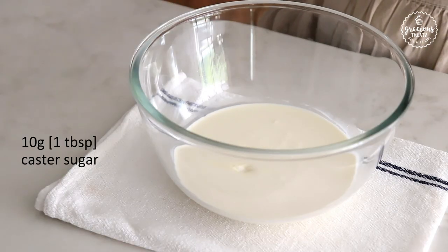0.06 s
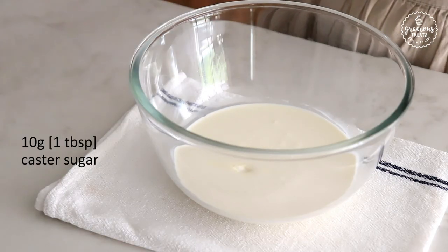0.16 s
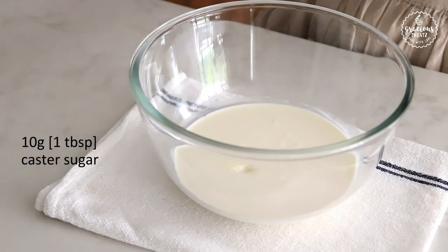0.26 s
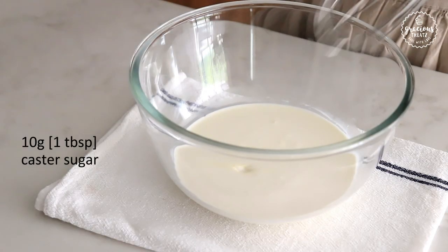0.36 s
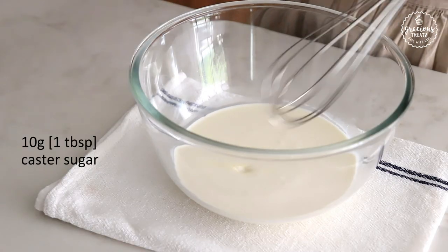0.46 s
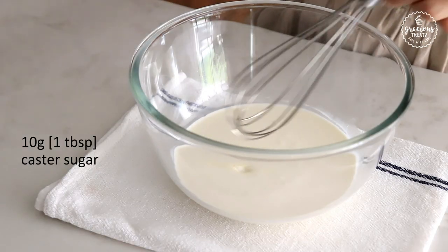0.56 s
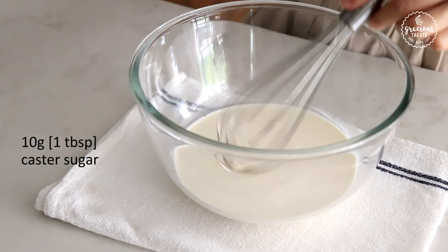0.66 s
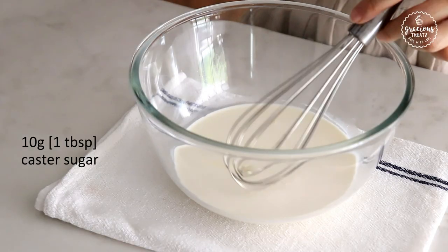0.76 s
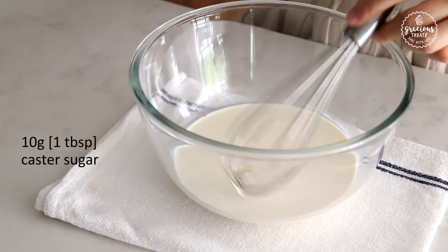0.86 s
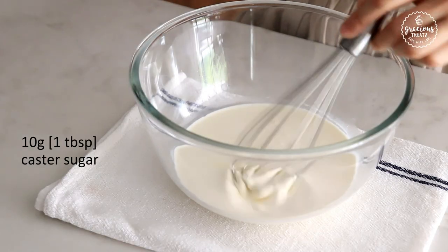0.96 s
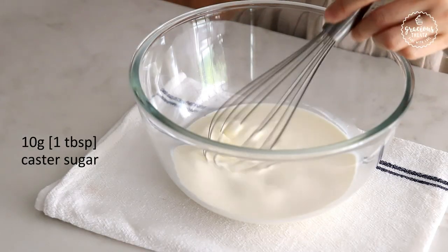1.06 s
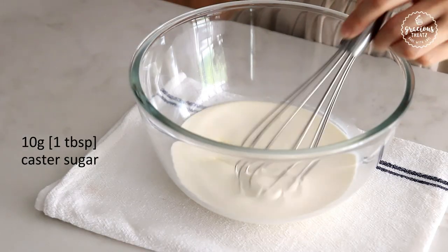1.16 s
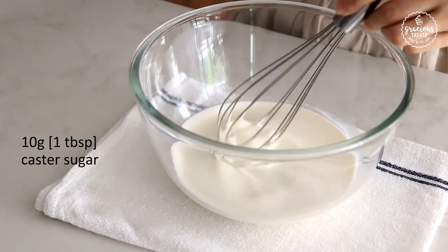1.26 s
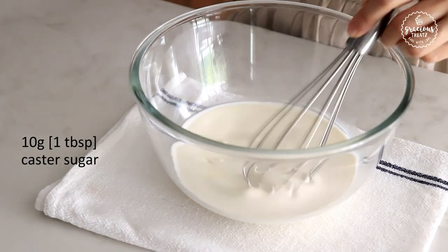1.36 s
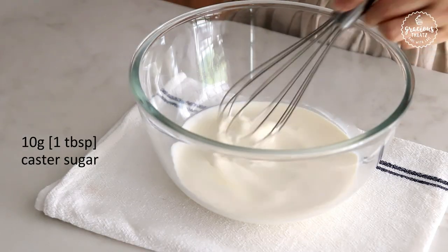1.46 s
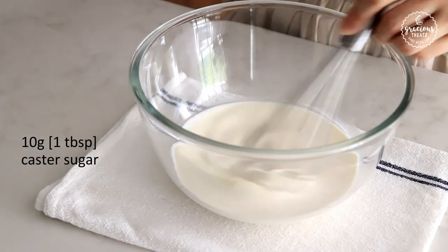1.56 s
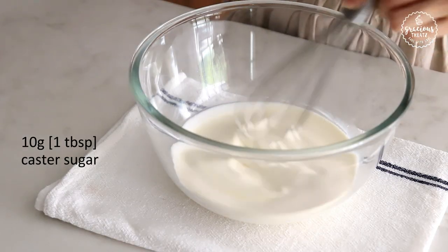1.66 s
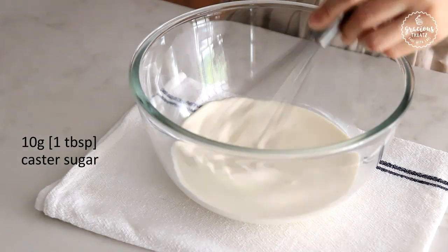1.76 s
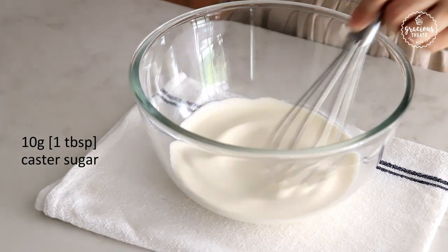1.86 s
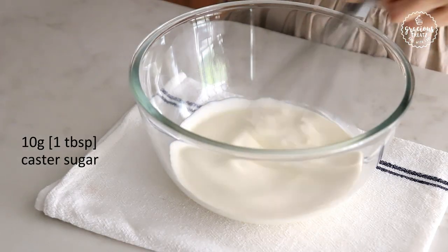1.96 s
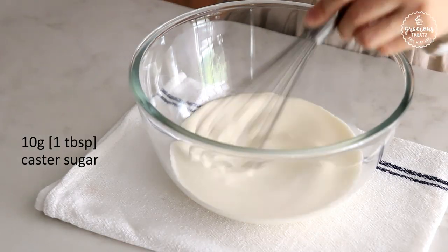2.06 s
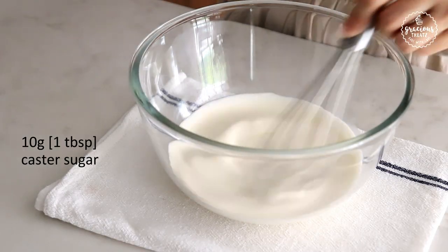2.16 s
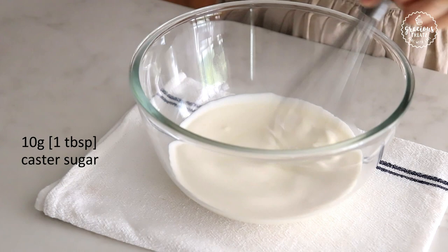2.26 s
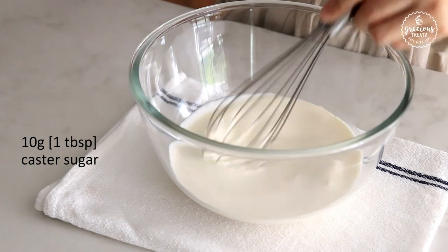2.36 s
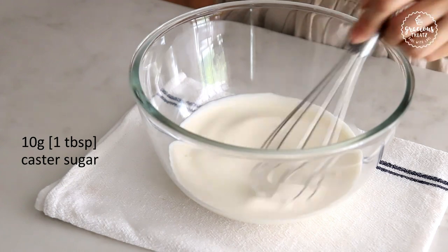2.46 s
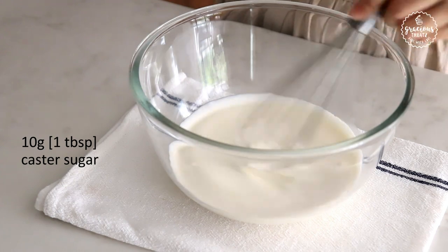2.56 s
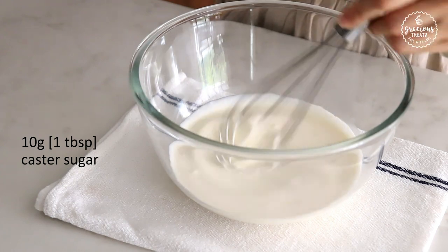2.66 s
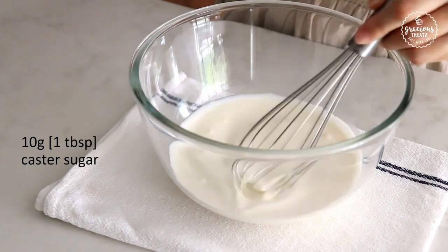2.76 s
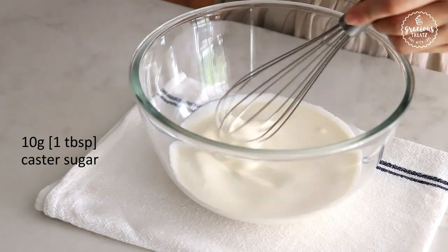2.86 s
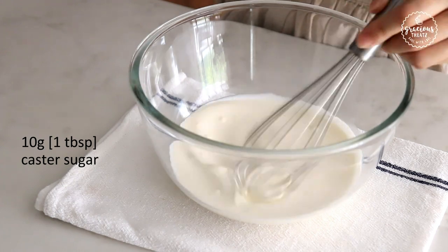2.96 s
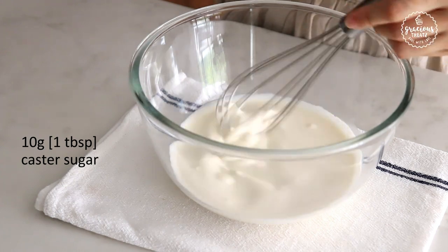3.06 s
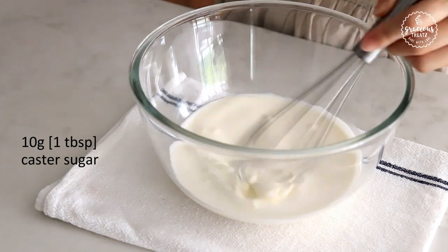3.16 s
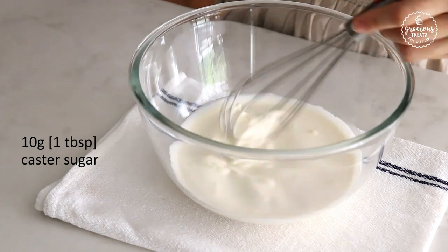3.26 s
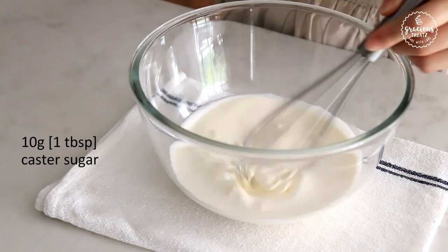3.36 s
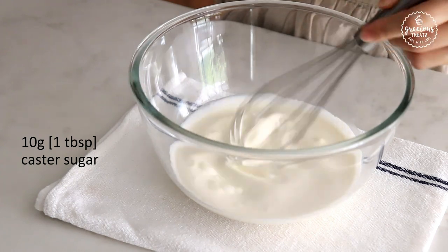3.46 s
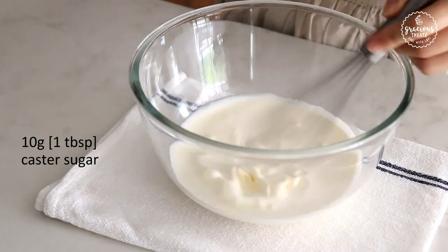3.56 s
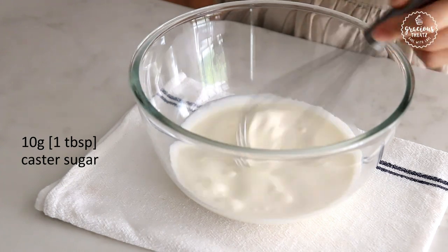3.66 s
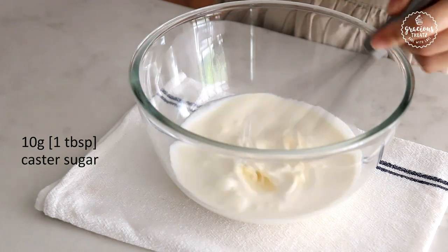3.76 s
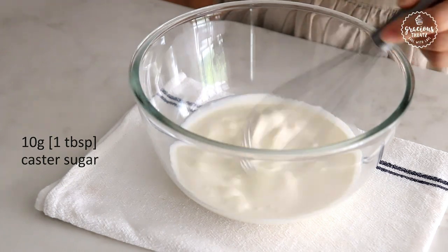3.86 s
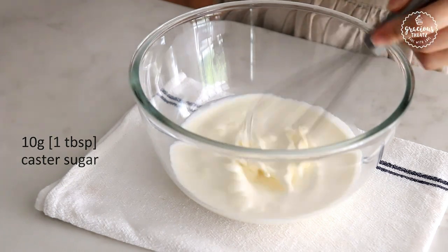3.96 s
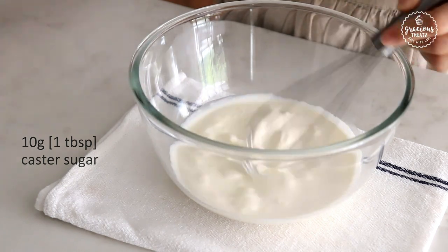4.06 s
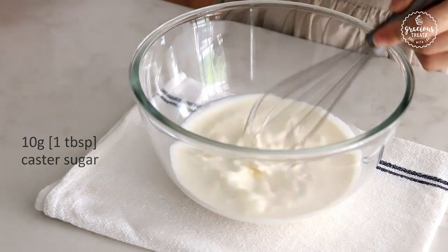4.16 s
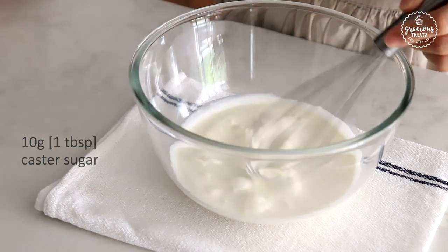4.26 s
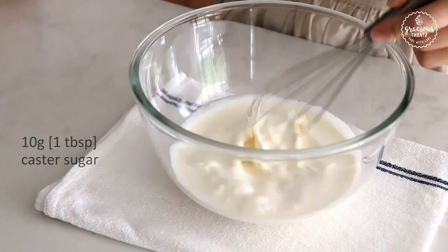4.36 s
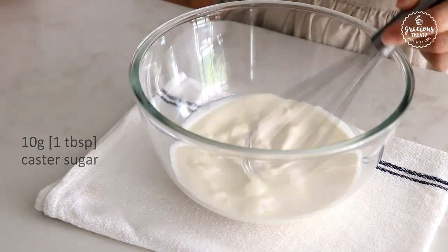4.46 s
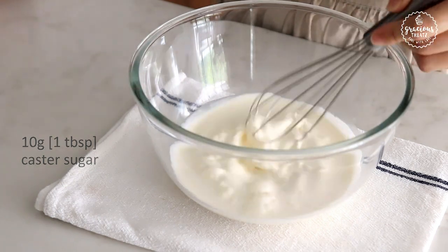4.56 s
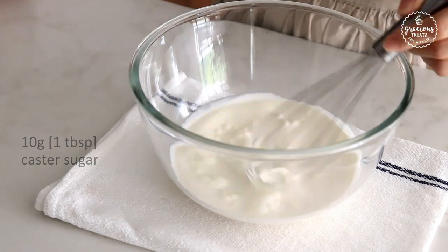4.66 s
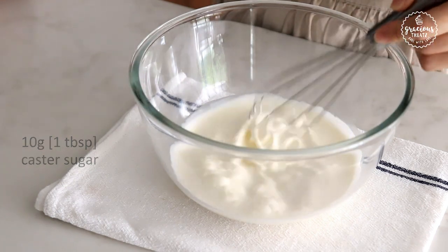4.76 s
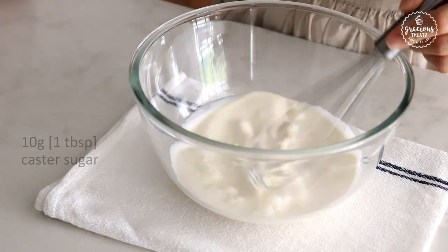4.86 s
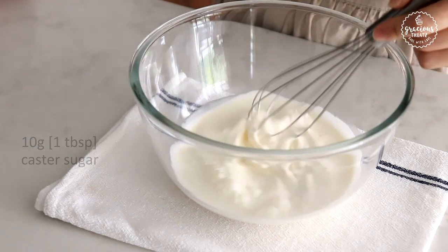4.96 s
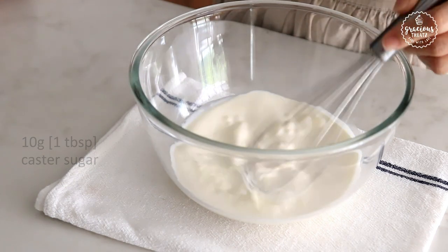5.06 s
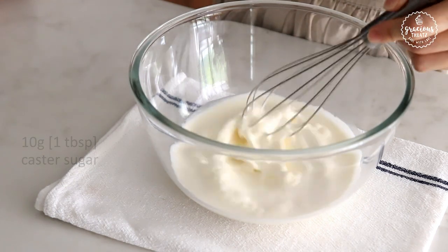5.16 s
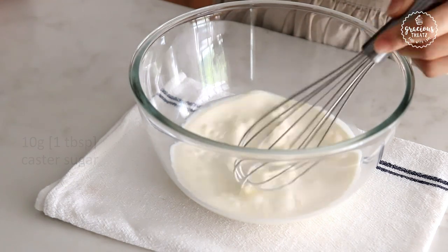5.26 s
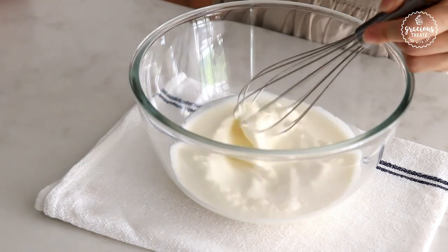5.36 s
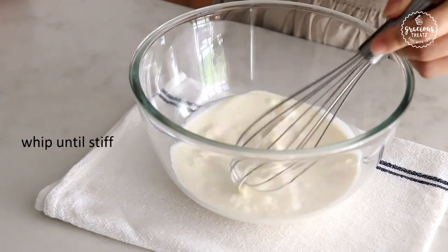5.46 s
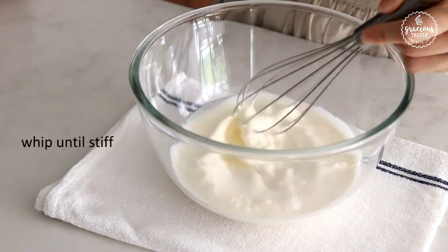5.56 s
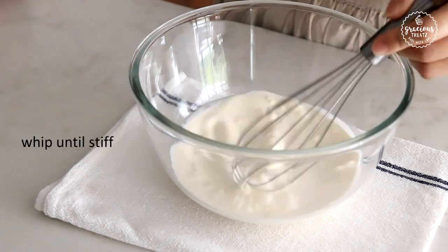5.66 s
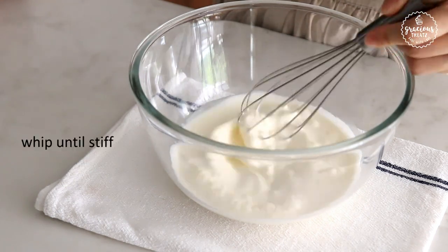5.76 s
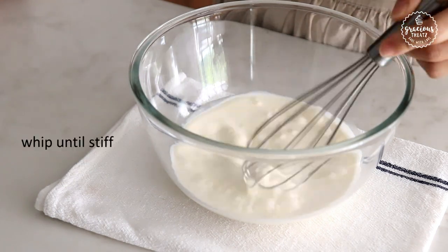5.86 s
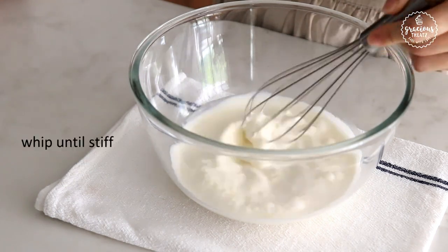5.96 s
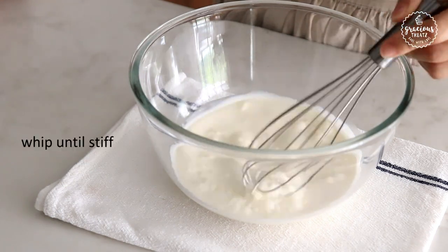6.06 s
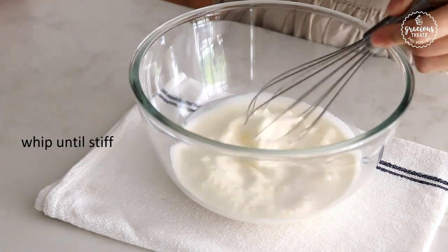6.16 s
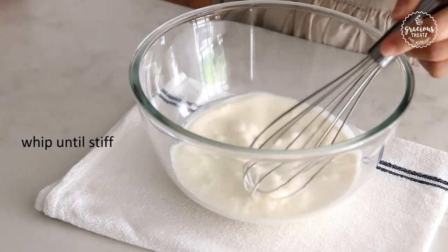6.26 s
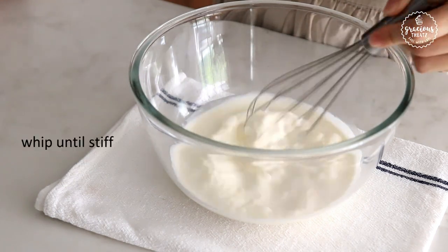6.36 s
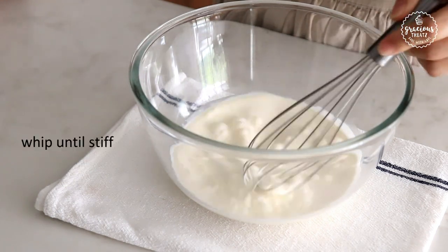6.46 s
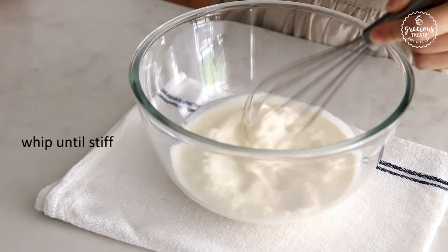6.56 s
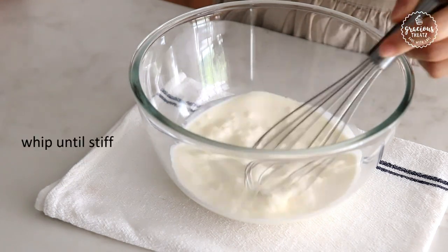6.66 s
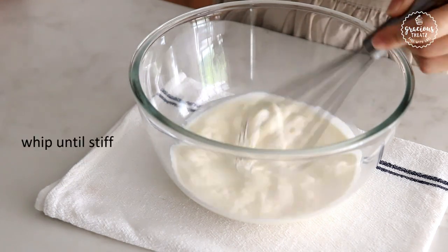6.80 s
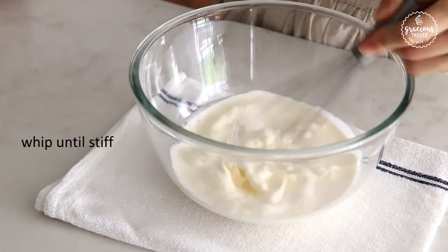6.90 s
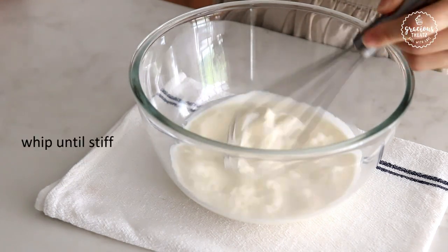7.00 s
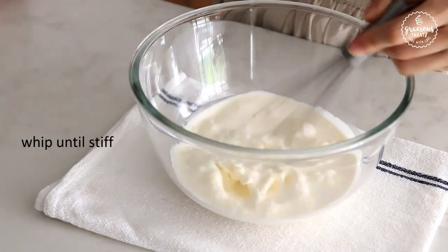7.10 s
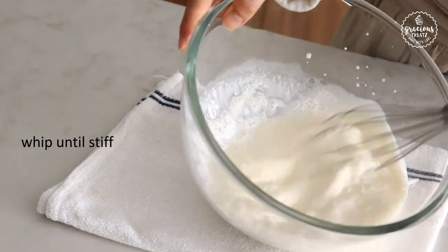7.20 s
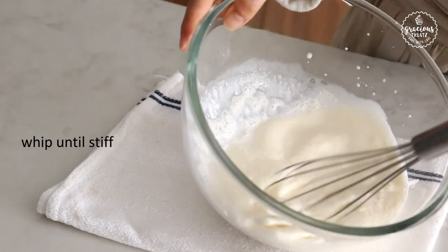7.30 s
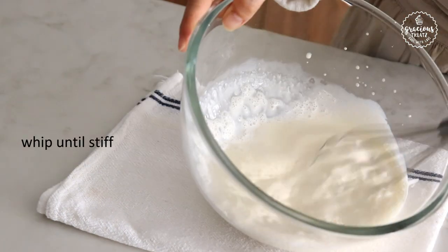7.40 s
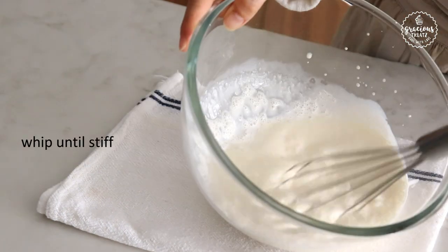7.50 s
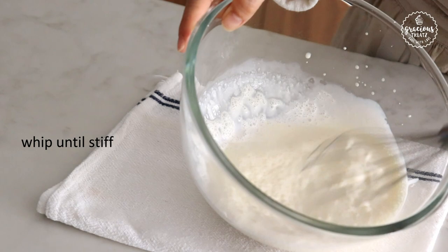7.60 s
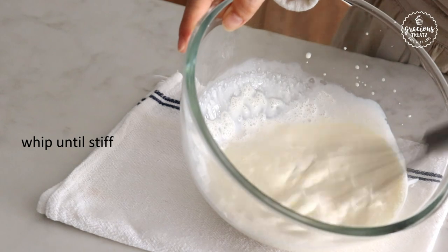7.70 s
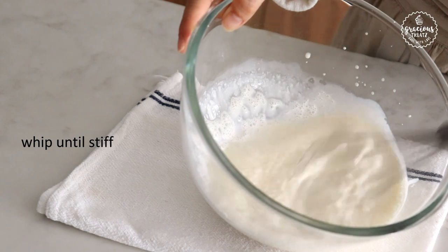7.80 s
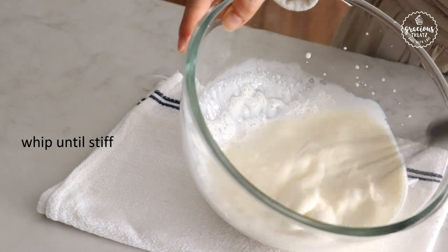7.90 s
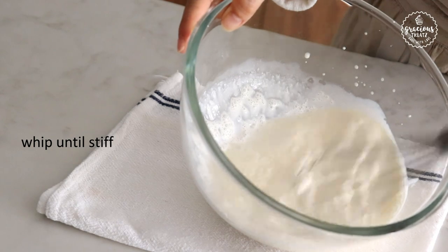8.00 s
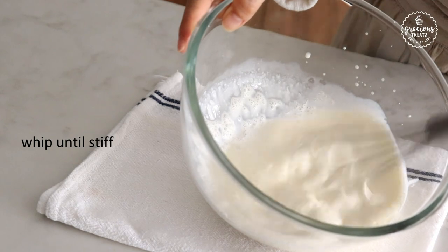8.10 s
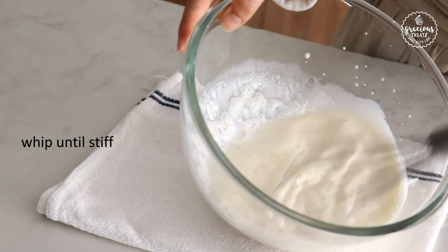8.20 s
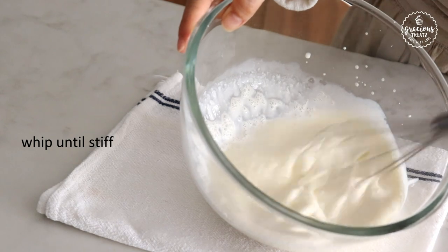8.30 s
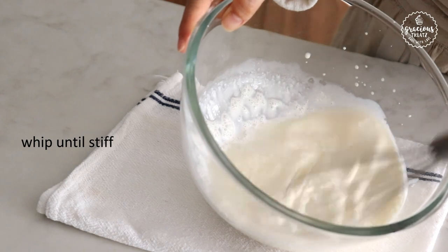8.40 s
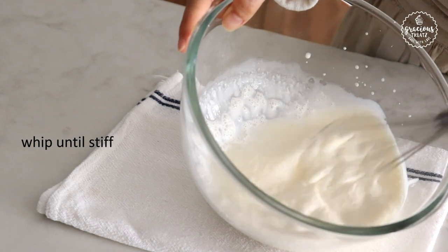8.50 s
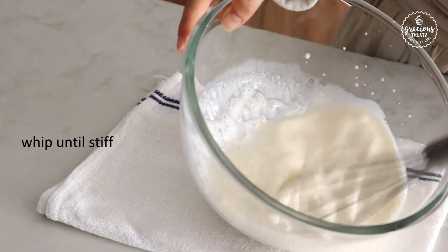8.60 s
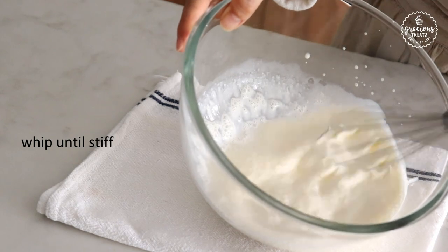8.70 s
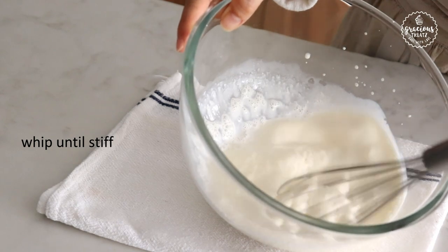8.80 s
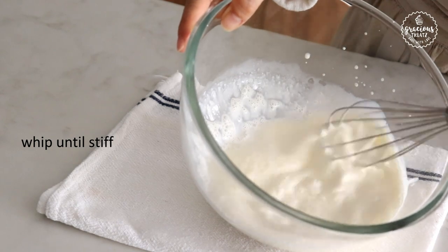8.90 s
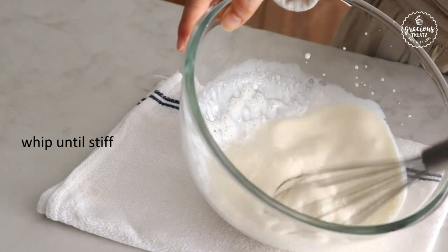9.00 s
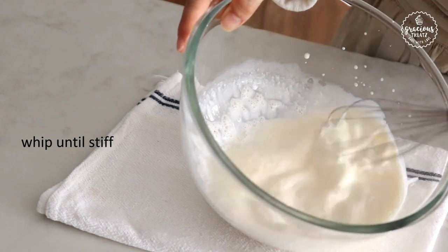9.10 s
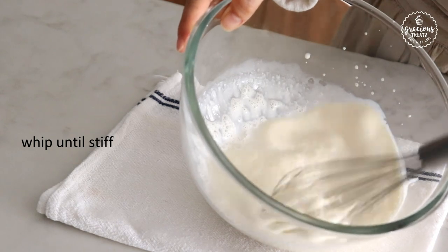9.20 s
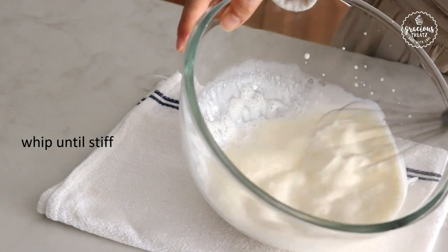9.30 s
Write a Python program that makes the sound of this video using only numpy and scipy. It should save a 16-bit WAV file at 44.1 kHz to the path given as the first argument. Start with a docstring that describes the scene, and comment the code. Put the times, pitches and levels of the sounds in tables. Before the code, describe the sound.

Close-up of cream being whisked by hand in a glass bowl on a towel, with a lively indoor echo. Soft room air first, then a bright double clink and gentle metallic scraping. Steady quick beating follows, wet and bubbly, with small plops, chirps and pops as the cream froths. A low bump marks the bowl being tilted, then denser glassy wire knocks continue to the end with little splashing.

```python
"""A wire whisk beats cream in a glass bowl standing on a towel in a quiet, echoing kitchen.
It clinks in and stirs, wires skidding and the rim singing, then beats about five turns a second.
Each turn rattles on the near and far wall through glass and wire modes and folds in swarms of bubbles.
Near the end the bowl is tilted: the wires hit more freely ringing glass up to three times a turn.
Contacts are noise rattles through ringing bodies; bubbles are gliding, dying sines."""
import sys
import numpy as np
from scipy import signal
from scipy.fft import rfft, irfft
from scipy.io import wavfile
from scipy.ndimage import uniform_filter1d

SR = 44100
rng = np.random.default_rng(int(sys.argv[2]) if len(sys.argv) > 2 else 0)


def int16_out(signal):
    """Quantize to a 16-bit WAV file."""
    q = np.round(np.clip(np.atleast_2d(signal).T, -1, 1) * 32767)
    wavfile.write(sys.argv[1], SR, q.astype(np.int16))


N = 411894
TIME = np.arange(N) / SR   # scene clock [s]
AGE = np.arange(SR // 5) / SR   # time since the start of one short sound [s]
MIDDLE_S = AGE.mean()   # centre of a sound that swells and fades

# Levels in the tables are relative: each layer adds its own gain.
# quiet kitchen air: (frequency [Hz], level [dB])
AIR_SPECTRUM = [(30, -68), (70, -18), (300, -3.5), (480, -9), (780, -9.5), (1200, -17.5), (3900, -22),
                (7000, -35.5), (16000, -38.5)]
AIR_DB = -62
# how the bowl is held: (time [s], cream on the wires [0-1], tilt [0-1])
BOWL_POSE = [(0, 0, 0), (1.5, .1, 0), (2.1, .7, 0), (2.9, 1, 0), (7.18, 1, 0), (7.33, 1, 1)]
BEATING_FROM_S, FROTHY_BY_S = 2.8, 7.6

# the tick of one wire on glass: (frequency [Hz], level [dB])
TICK_SPECTRUM = [(100, -78), (400, 6), (700, 19.5), (1500, -28.5), (2600, 28), (4000, -5), (6000, 20.5),
                 (9000, -4.5), (13000, -4), (16000, 22)]
# glass bowl modes: (frequency [Hz], width [Hz], level [dB])
GLASS_MODES = [(349.6, 21.4, 7), (582, 102, -3.5), (776, 103, -0.5), (885, 33, 3), (1424, 84, -1.5),
               (2466, 35, 4), (2550, 234, 4), (3783, 186, 9.5), (4950, 120, -5.5), (7290, 66, -5.5),
               (7650, 235, 0), (11090, 1020, -0.5), (13640, 1270, 2)]
# bare wire loop modes: (frequency [Hz], width [Hz], level [dB])
WIRE_MODES = [(2450, 60, -4), (3130, 50, -3), (3410, 45, -1), (4600, 7, 1.5), (7080, 16, 11), (7380, 35, 1),
              (9080, 40, 0), (10320, 36, 3), (11930, 36, 3), (14250, 70, 1)]
# bowl and worktop bumped through the towel: (frequency [Hz], width [Hz], level [dB])
WORKTOP_MODES = [(70, 10, 6), (138, 14, 2), (215, 35, -4), (385, 30, 1)]
# the rim singing under a sliding wire: (frequency [Hz], width [Hz], level [dB])
RIM_MODES = [(2430, 70, 8), (3720, 140, 7), (4980, 160, -4)]

# slow stirring, the wires tap the bowl: (time [s], strength [dB])
STIRRING_TAPS = [(1.0044, -21.5), (1.05, -20.5), (1.2102, -35), (1.4014, -27.5), (1.5716, -35),
                 (1.7736, -35.5), (2.063, -27.5), (2.489, -38), (2.509, -33.5)]
TAP_RING_DB = -4.5   # the rim's answer against the tap, before the layer gains
STIRRING_TO_S = 2.71
# the wires skid along the glass: (time [s], level [dB])
WIRE_SKIDS = [(1.284, -50), (1.482, -50.5), (1.634, -49.5), (1.719, -51.5), (1.835, -54.5), (2.206, -51.5),
              (2.374, -50)]
# a wire sticks and slips, and the rim sings one note: (time [s], level [dB], pitch [Hz])
RIM_SQUEALS = [(1.72, -41.5, 3670), (2.34, -48.5, 3710)]

# beating, one row per turn of the wrist:
# (time [s], strength [dB], time to cross the bowl [s], far wall against near wall [dB])
WRIST_TURNS = [(2.864, -23, 0.071, -42), (3.063, -23, 0.03, -40), (3.255, -29, 0.065, -1.5),
               (3.4564, -20, 0.054, -12), (3.6392, -23.5, 0.06, 0), (3.831, -24, 0.054, 0),
               (4.027, -21.5, 0.053, -3), (4.2082, -26, 0.066, -7.5), (4.4066, -20.5, 0.042, -1.5),
               (4.6043, -21.5, 0.052, 0), (4.7958, -22.5, 0.05, 0), (4.9942, -20, 0.03, -17),
               (5.1894, -16.5, 0.051, -11), (5.3864, -22, 0.031, 0), (5.5874, -23, 0.043, -2.5),
               (5.788, -27, 0.052, 1), (5.986, -24.5, .048, 3), (6.1842, -20, 0.045, -11),
               (6.3836, -19.5, 0.05, -2), (6.573, -20, 0.044, -4.5), (6.7719, -17.5, 0.044, -5),
               (6.974, -18, 0.042, -1), (7.178, -17, 0.071, -13)]
# cream thrown by a contact, against its clink: (time [s], level [dB])
CREAM_THROW = [(2.85, -3.5), (4.4, 4.5), (7.18, 2.5)]
LATER_SPLASH_DB = -5   # the far wall gets less of the cream
# small bubbles driven under by the wires: (frequency [Hz], level [dB])
FIZZ_SPECTRUM = [(1700, -75), (2400, 12.5), (2850, -7), (3500, 17.5), (4300, -1.5)]
# thick cream slapping about: (frequency [Hz], level [dB])
SLOSH_SPECTRUM = [(70, 1.5), (160, 4), (370, 2.5), (900, 0), (1500, 8.5), (3800, 3.5), (6000, -6),
                  (16000, -7)]
# cream churned between strokes: (time [s], level [dB])
CHURN_LEVEL = [(2.85, -55), (4.0, -50), (5.3, -44.5), (5.8, -52.5), (6.7, -41.5), (7.4, -47)]
# shallow bubbles gliding upward as they surface: (time [s], level [dB], middle pitch [Hz])
SURFACING_CHIRPS = [(3.371, -45, 1710), (3.468, -18, 2895), (3.583, -31.5, 2500), (3.958, -34.5, 3120),
                    (4.04, -24, 3500), (4.338, -35.5, 1740), (4.897, -37.5, 1820), (5.283, -26, 1284),
                    (6.265, -31, 2276), (6.398, -13.5, 3440), (6.685, -37.5, 2210), (7.055, -37, 1550)]
# air pockets folded into the cream: (time [s], level [dB], pitch [Hz])
AIR_POCKETS = [(2.94, -30.5, 843), (3.132, -30.5, 682), (3.548, -41.5, 960), (3.901, -21.5, 675),
               (4.033, 1.5, 2240), (4.093, -21.5, 808), (4.671, -24.5, 852), (4.862, -46, 990),
               (5.117, -30.5, 1380), (5.275, -18.5, 1000), (5.453, -15, 1260), (6.232, -23.5, 1227),
               (6.253, -20, 680), (6.436, -19, 1273), (6.627, -23.5, 634), (6.865, -22.5, 892),
               (7.025, -27.5, 710)]
# bubbles bursting at the surface: (time [s], level [dB], pitch [Hz])
SURFACE_POPS = [(3.292, -18.5, 3900), (4.054, -20.5, 3660), (4.711, -19.5, 2060), (5.211, -17, 3440),
                (5.3106, -16.5, 2600), (5.87, -21, 2380), (6.018, -23, 1890), (6.63, -11.5, 3830)]

# the tilted bowl bumps on the towel: (time [s], level [dB])
TOWEL_BUMPS = [(7.213, -43.5), (7.393, -48)]
# the wires knock on the wall of the tilted bowl: (time [s], strength [dB])
TILTED_KNOCKS = [(7.3464, -18), (7.3905, -14.5), (7.5351, -31), (7.5801, -24), (7.7429, -31.5),
                 (7.8183, -21), (7.9235, -21.5), (8.0003, -16), (8.109, -17), (8.2036, -20), (8.308, -19),
                 (8.3864, -17.5), (8.4975, -16), (8.5817, -23), (8.69, -19.5), (8.765, -15.5),
                 (8.8708, -18), (8.9506, -19.5), (9.0635, -18), (9.1385, -14.5), (9.2526, -19),
                 (9.2927, -18.5)]
# on a swing longer than this the wires graze the bottom, at this share of the way between two knocks
GRAZE_DB, GRAZE_SHARE, WIDE_SWING_S = -23, 0.43, 0.06
TILTED_SPLASH_DB = -27   # little cream is thrown once the bowl is tilted

# kitchen echo: (frequency [Hz], decay by 60 dB [s], level [dB])
KITCHEN_ECHO = [(198, 0.26, -3.5), (700, 0.46, -9.5), (1380, 0.21, -11.5), (3300, 0.72, -15.5),
                (7060, 0.92, -15), (15800, 0.29, -32.5)]
CUTOFF_HZ = 15900


def from_db(db):
    """Decibels to gain."""
    return 10 ** (np.asarray(db) / 20)


def unit(x):
    """Scale to an energy of one."""
    return x / np.sqrt(np.sum(x ** 2) + 1e-20)


def levelled(x, size=256):
    """Scale so that the loudest few milliseconds have an rms of one."""
    return x / np.sqrt(uniform_filter1d(x ** 2, size).max() + 1e-20)


def at_hz(points, hz):
    """Read a spectrum on a log-frequency axis."""
    known, values = np.transpose(points)
    return np.interp(np.log(np.maximum(hz, 1)), np.log(known), values)


def curve(rows, s):
    """Read every column of a curve at the given times."""
    times, *columns = np.transpose(rows)
    return [np.interp(s, times, c) for c in columns]


def add(out, s, sound):
    """Mix a sound in at a time."""
    start = max(0, int(s * SR))
    part = out[start:start + len(sound)]
    part += sound[:len(part)]


def through(x, response):
    """Pass a signal through an impulse response."""
    return signal.fftconvolve(x, response)[:len(x)]


def causal(spectrum):
    """Minimum-phase impulse response with this spectrum: its energy comes as early as possible."""
    db = at_hz(spectrum, np.fft.rfftfreq(len(AGE), 1 / SR))
    cepstrum = irfft(np.log(from_db(db)))
    half = len(cepstrum) // 2
    return unit(irfft(np.exp(rfft(2 * cepstrum[:half], 2 * half))))


def tones(modes):
    """One dying tone per mode; a wider mode dies sooner."""
    return np.array([
        (-1) ** k * from_db(db) * width * np.exp(-np.pi * width * AGE) * np.cos(2 * np.pi * hz * AGE)
        for k, (hz, width, db) in enumerate(modes)])


def ringing(modes):
    """Impulse response of a body: all its modes together."""
    return unit(tones(modes).sum(axis=0))


def wander(per_s):
    """Slow chance with a spread near one."""
    return np.interp(TIME * per_s, np.arange(N), rng.standard_normal(N))


def short_noise():
    """White noise as long as one short sound."""
    return rng.standard_normal(len(AGE))


def grainy_noise(grit_db, clump_db, clumps_per_s):
    """Noise of uneven grains that gather in clumps, with an rms of one."""
    level_db = grit_db * rng.standard_normal(N) + clump_db * wander(clumps_per_s)
    return unit(rng.standard_normal(N) * from_db(level_db)) * np.sqrt(N)


def froth(s):
    """How much air has been beaten in, 0-1."""
    return np.interp(s, [BEATING_FROM_S, FROTHY_BY_S], [0, 1])


def room_air():
    """The quiet kitchen: steady noise in the colour of the room."""
    return from_db(AIR_DB) * through(rng.standard_normal(N), causal(AIR_SPECTRUM))


def contacts():
    """Meetings of wires and glass as sorted (time [s], clink [dB], splash [dB], glancing [0-1])."""
    rows = [(s, db, db + TAP_RING_DB, 0) for s, db in STIRRING_TAPS]
    for s, db, cross_s, far_db in WRIST_TURNS:
        wet = db + curve(CREAM_THROW, s)[0]
        rows.append((s, db, wet, 0))
        rows.append((s + cross_s, db + far_db, wet + far_db + LATER_SPLASH_DB, 0))
    rows += [(s, db, db + TILTED_SPLASH_DB, 0) for s, db in TILTED_KNOCKS]
    for (near, _), (far, _) in zip(TILTED_KNOCKS[::2], TILTED_KNOCKS[1::2]):
        if far - near > WIDE_SWING_S:
            graze_at = near + GRAZE_SHARE * (far - near)
            rows.append((graze_at, GRAZE_DB, GRAZE_DB + TILTED_SPLASH_DB, 1))
    return sorted(rows)


def rattle(length, gap_s=.0033, tick_s=.0017, uneven_db=2.4, drag_db=-12, count=10):
    """The loops land one after another, each with a short gritty tick, and drag on between."""
    when = np.r_[0, np.cumsum(gap_s * rng.uniform(.4, 1.6, count - 1))]
    force = from_db(rng.normal(0, uneven_db, count)) / (1 + (when / length) ** 4)
    since = AGE - when[:, None]
    ticks = force @ ((since >= 0) * np.exp(-np.abs(since) / tick_s))
    drag = from_db(drag_db) * np.exp(-AGE / length)
    return (ticks + drag) * short_noise()


def stroke_force(s, glancing, rattle_s=0.0083, thick_drag=0.95, graze_s=0.0017, cushion=1.0):
    """A rattle that thickening cream draws out and deep cream softens; a graze swells in."""
    coated, tilt = curve(BOWL_POSE, s)
    thickness = froth(s) * (1 - tilt) + (1 - coated) / 2
    force = rattle(rattle_s * (1 + glancing + thick_drag * thickness))
    if glancing:
        force = force * (1 - np.exp(-AGE / graze_s))
    # adding the previous sample dulls the treble
    return through(force, np.array([1, cushion * coated * (1 - tilt)]))


def jingle(width_hz=85, count=32):
    """Wet loops ring briefly, at pitches that depend on where they are touched."""
    pitches = np.geomspace(2200, 15500, count) * rng.uniform(.94, 1.06, count)
    return ringing([(hz, width_hz, 0) for hz in pitches])


def struck_glass(partials, tilt, spread_db=4, towel_db=-10, freed_db=3):
    """Each blow excites the modes unevenly; the towel damps the lowest, tilting frees the low ones."""
    db = spread_db * rng.standard_normal(len(partials))
    db[0] += towel_db * (1 - tilt)
    db[:len(db) // 2 - 1] += freed_db * tilt
    return unit(from_db(db) @ partials)


def bare_loops(detune=0.0046, count=4):
    """Nearly alike loops bend anew at each touch, so every wire mode is a beating cluster."""
    return unit(sum(
        ringing([(hz * (1 + detune * rng.standard_normal()), width, db) for hz, width, db in WIRE_MODES])
        for _ in range(count)))


def stroke_body(tick, glass_tones, s, tick_db=-3, jingle_db=0.0, glass_db=1, bare_db=11):
    """What one stroke sets ringing: wire tick, wet loops, glass and any still bare wire."""
    coated, tilt = curve(BOWL_POSE, s)
    body = from_db(tick_db) * tick + from_db(jingle_db) * jingle()
    body = body + from_db(glass_db) * struck_glass(glass_tones, tilt)
    if coated < 1:
        body = body + from_db(bare_db) * (1 - coated) * bare_loops()
    return body


def bubble(hz, t60, rise):
    """A bubble pinches off within a cycle, rings, and climbs in pitch as it nears the surface."""
    t = AGE[AGE < t60]
    swell = 1 - np.exp(-(hz * t) ** 2)
    return swell * from_db(-60 * t / t60) * np.sin(2 * np.pi * hz * t * (1 + rise * t / t60 / 2))


def splash(airy, linger_s=0.014, fade_s=0.024, cycles=60, rise=0.26, size_db=1.5,
           colour_octaves=0.043, sink_s=0.41, count=48):
    """A cloud of small bubbles, shallow ones chirping; froth damps, delays and lowers them."""
    out = np.zeros(len(AGE))
    colour = 2 ** (colour_octaves * rng.standard_normal())   # coarser or finer each time
    for k, (place, size, depth) in enumerate(rng.random((count, 3))):
        hz = 1700 + 2600 * place
        delay = -linger_s * np.log(1 - k / count)
        climb = (rise + (1 - depth) ** 2) / (1 + 4 * airy)
        gain = from_db(at_hz(FIZZ_SPECTRUM, hz)) * np.exp(-delay / fade_s)
        gain = gain * from_db(-size_db * np.log(size))
        pitch = hz * colour * np.exp(-airy * delay / sink_s)
        add(out, delay * (1 + airy / 2), gain * bubble(pitch, cycles / hz / (1 + airy), climb))
    return out


def spatter(per_s=700, fade_s=0.0083):
    """Thick cream lands as a quick shower of separate blobs."""
    landing = rng.random(len(AGE)) < per_s / SR
    return landing * short_noise() * np.sqrt(AGE) * np.exp(-AGE / fade_s)


def strokes(tick, clink_db=-3, splash_db=-1, thud_db=-34, tilted_thud_db=4, rim_db=-5,
            slap_db=-12, scoop_db=6):
    """Each stroke rattles on the glass, bumps the worktop, and splashes the cream or rings the rim."""
    out = np.zeros(N)
    worktop, rim, slosh = ringing(WORKTOP_MODES), ringing(RIM_MODES), causal(SLOSH_SPECTRUM)
    glass_tones = tones(GLASS_MODES)
    for s, clink, wet, glancing in contacts():
        tilt = curve(BOWL_POSE, s)[1]
        force = stroke_force(s, glancing)
        clinking = through(force, stroke_body(tick, glass_tones, s))
        add(out, s, from_db(clink + clink_db) * levelled(clinking))
        thud_level = from_db(clink + thud_db + tilted_thud_db * tilt)
        add(out, s, thud_level * levelled(through(force, worktop)))
        slap_level = tilt * from_db(clink + slap_db + scoop_db * glancing)
        add(out, s, slap_level * levelled(through(spatter(), slosh)))
        if s > BEATING_FROM_S:
            add(out, s, from_db(wet + splash_db) * levelled(splash(froth(s))))
        else:   # slow stirring traps no air: the rim rings instead
            add(out, s, from_db(wet + rim_db) * levelled(through(force, rim + tick)))
    return out


def shimmer(force, count=9):
    """As the contact point travels, one set of wire pitches hands over to the next."""
    place = 12 * TIME + wander(12) / 2   # about twelve handovers a second
    return sum(through(force * np.maximum(0, 1 - np.abs((place - k) % count - 1)), jingle())
               for k in range(count))


def wavering(x, lag_s=.0005, per_s=35):
    """Changing pressure on the wires bends every note slightly."""
    return np.interp(TIME + lag_s * wander(per_s), TIME, x)


def squeals(swell_s=0.018, waver_hz=70, flutter_db=4, flutters_per_s=120):
    """The rim's note swells and fades, fluttering and wavering as cream washes up the glass."""
    out, t = np.zeros(N), AGE - MIDDLE_S
    for s, db, hz in RIM_SQUEALS:
        flutter = flutter_db * wander(flutters_per_s)[:len(t)]
        level = from_db(db + flutter) * np.exp(-(t / swell_s) ** 2)
        pitch = hz + waver_hz * wander(flutters_per_s)[:len(t)]
        add(out, s - MIDDLE_S, level * np.sin(2 * np.pi * np.cumsum(pitch) / SR))
    return out


def sliding(tick, glass, steady_db=-62, skid_s=0.018, grit_db=5, slips_per_s=160, slip_db=3, tick_db=-6,
            rim_db=-3, sing_db=7.5, swells_per_s=30, rumble_db=-15, shimmer_db=-1):
    """Wires slip unevenly along the glass and keep the loops and the rim faintly ringing."""
    grit = grainy_noise(grit_db, slip_db, slips_per_s)
    touching = (TIME > STIRRING_TAPS[0][0]) * (TIME < STIRRING_TO_S)
    coated, _ = curve(BOWL_POSE, TIME)
    rub = grit * from_db(steady_db) * touching * coated
    skids = sum(from_db(db) * np.exp(-((TIME - s) / skid_s) ** 2) for s, db in WIRE_SKIDS)
    force = rub + grit * skids
    # each rim mode swells on its own
    singing = sum(through(rub * from_db(rim_db + mode[2] + sing_db * wander(swells_per_s)), ringing([mode]))
                  for mode in RIM_MODES)
    body = glass / 2 + from_db(tick_db) * tick + from_db(rumble_db) * ringing(WORKTOP_MODES)
    scrape = through(force, body) + from_db(shimmer_db) * shimmer(force)
    bare = through(force * (1 - coated), bare_loops())
    return scrape + wavering(bare + singing + squeals())


def churn(level_db=3, upright_db=-7, settle_s=0.097, grit_db=5, clump_db=4, clumps_per_s=180):
    """Grainy slosh jumps up with each stroke and settles after it."""
    times = np.array(contacts())[:, 0]
    latest = np.maximum(np.searchsorted(times, TIME) - 1, 0)
    since = np.abs(TIME - times[latest])
    grains = grainy_noise(grit_db, clump_db, clumps_per_s)
    db = curve(CHURN_LEVEL, TIME)[0] + level_db + upright_db * (1 - curve(BOWL_POSE, TIME)[1])
    stirred = grains * from_db(db) * np.exp(-since / settle_s) * (TIME > BEATING_FROM_S)
    return through(stirred, causal(SLOSH_SPECTRUM))


def chirps(trail_s=0.023, trail_db=-9, trail_hz=3400, cycles=13, octaves=.19, flutter_db=3):
    """A bubble swells, fades and climbs as the cream above it thins; one trails every turn."""
    out, t = np.zeros(N), AGE - MIDDLE_S
    trailing = [(s + trail_s, db + trail_db, trail_hz * (1 + rng.standard_normal() / 20))
                for s, db, _, _ in WRIST_TURNS]
    for s, db, hz in SURFACING_CHIRPS + trailing:
        life = t * hz / cycles
        flutter = flutter_db * wander(2 * hz / cycles)[:len(t)]
        level = from_db(db + flutter) * np.exp(-life ** 2)
        pitch = hz * 2 ** (2 * octaves * np.tanh(life / 2))
        add(out, s - MIDDLE_S, level * np.sin(2 * np.pi * np.cumsum(pitch) / SR))
    return out


def droplets(level_db=-37, froth_db=9, spread_db=5, after_s=0.038, lasts_s=0.1,
             low_hz=3000, high_hz=12000, cycles=22, count=6):
    """Bursting bubbles and falling drops: short rising ticks, sharper and louder as cream froths."""
    out = np.zeros(N)
    for s, *_ in WRIST_TURNS + TILTED_KNOCKS[::2]:
        airy = froth(s)
        for (when, place), size in zip(rng.random((count, 2)), rng.standard_normal(count)):
            hz = low_hz * (high_hz / low_hz) ** place
            gain = from_db(level_db + froth_db * airy + spread_db * size)
            add(out, s + after_s + lasts_s * when, gain * bubble(hz, cycles / hz / (1 + airy) ** 2, rise=1))
    return out


def sips(level_db=-18, after_s=0.047, lasts_s=0.07, low_hz=1250, high_hz=3200, cycles=30, spread_db=4,
         stray_octaves=0.2, frothy_octaves=0.31, count=26):
    """The lifted whisk's furrow closes in ever smaller bubbles; froth makes them deeper and jumbled."""
    out = np.zeros(N)
    for s, db, _, _ in WRIST_TURNS:
        airy = froth(s)
        upright = 1 - curve(BOWL_POSE, s + after_s + lasts_s)[1]
        wet = db + curve(CREAM_THROW, s)[0] + LATER_SPLASH_DB
        lowest = low_hz / (1 + airy / 2)
        for shut, (size, stray) in zip(rng.random(count), rng.standard_normal((count, 2))):
            jumble = 2 ** (stray * (stray_octaves + frothy_octaves * airy))
            hz = lowest * (high_hz / low_hz) ** shut * jumble
            gain = upright * (1 + airy ** 2) * from_db(wet + level_db + spread_db * size) * np.exp(-shut / 2)
            sip = bubble(hz, cycles / hz / (1 + airy / 2), rise=1 / (1 + airy))
            add(out, s + after_s + lasts_s * shut, gain * sip)
    return out


def plops(level_db=4, close_s=0.0021, sag=0.3, rise=0.00272, cycles=58, shut_cycles=30,
          hook=0.06, hook_db=-26):
    """A pocket closes, rings with a trembling, creeping note, and hooks upward as it is squeezed shut."""
    out = np.zeros(N)
    for s, db, hz in AIR_POCKETS:
        opening = np.exp(-AGE / close_s)
        life = AGE * hz   # in cycles
        squeeze = np.clip(life - shut_cycles, 0, shut_cycles)
        pitch = hz * (1 + sag * opening + rise * life + hook * squeeze)
        phase = 2 * np.pi * np.cumsum(pitch) / SR
        ring = from_db(-60 * life * (1 + froth(s) / 2) / cycles)   # shorter in froth
        shut = squeeze / shut_cycles
        level = ring + from_db(hook_db) * np.sin(np.pi * shut) * (1 - shut)
        tremble_db = 2 * wander(hz / 2 / np.pi)[:len(AGE)]
        gain = from_db(db + level_db + tremble_db)
        add(out, s - close_s, gain * level * (1 - opening) ** 2 * np.sin(phase))
    return out


def entries(level_db=-14, ahead_s=0.01):
    """As the cream gains volume, each turn cuts into it just before the wires reach the glass."""
    out = np.zeros(N)
    for s, db, _, _ in WRIST_TURNS:
        depth = froth(s) ** 4 * (1 - curve(BOWL_POSE, s)[1])
        if depth > 0:
            gain = depth * from_db(db + curve(CREAM_THROW, s)[0] + level_db)
            add(out, s - ahead_s, gain * levelled(splash(froth(s))))
    return out


def pops(tick, level_db=3, t60=0.017, snap_s=0.0028, snap_db=-5):
    """The film snaps and the opened cavity rings briefly."""
    out = np.zeros(N)
    for s, db, hz in SURFACE_POPS:
        add(out, s, from_db(db + level_db) * bubble(hz, t60, rise=0.04))
        snap = through(np.exp(-AGE / snap_s) * short_noise(), tick)
        add(out, s, from_db(db + snap_db) * snap)
    return out


def bumps(settle_s=0.077):
    """The tilted bowl rolls on the towel and rumbles into the worktop."""
    out = np.zeros(N)
    for s, db in TOWEL_BUMPS:
        rumble = through(np.exp(-AGE / settle_s) * short_noise(), ringing(WORKTOP_MODES))
        add(out, s, from_db(db) * levelled(rumble))
    return out


def kitchen(x, first_echo_s=0.0021, count=14):
    """Diffuse echoes: noise bands that each swell in and die at their own rate."""
    t, response = np.arange(SR) / SR, 0
    edges = np.geomspace(40, 17000, count + 1)
    table = np.array(KITCHEN_ECHO)
    for low, high in zip(edges, edges[1:]):
        hz = np.sqrt(low * high)
        band_filter = signal.butter(2, [low, high], "band", fs=SR, output="sos")
        band = signal.sosfilt(band_filter, rng.standard_normal(SR))
        decay = from_db(-60 * t / at_hz(table[:, :2], hz))
        tail = unit(band * decay * (1 - np.exp(-(t / first_echo_s) ** 2)))
        response = response + tail * from_db(at_hz(table[:, ::2], hz)) * np.sqrt(2 * (high - low) / SR)
    return through(x, response)


def scene():
    """Whisk, cream and bowl in the quiet room."""
    tick, glass = causal(TICK_SPECTRUM), ringing(GLASS_MODES)
    cream = churn() + chirps() + droplets() + sips() + plops() + entries() + pops(tick)
    bowl = strokes(tick) + sliding(tick, glass) + bumps() + cream
    return (bowl + kitchen(bowl) + room_air())[None]


def record(dry):
    """The deepest bass below about 54 Hz is thinned away; the top is cut steeply."""
    thinned = signal.sosfilt(signal.butter(6, 54, "high", fs=SR, output="sos"), dry)
    return signal.sosfilt(signal.ellip(10, .2, 80, CUTOFF_HZ, fs=SR, output="sos"), thinned)


dry = scene()
out = record(dry)
int16_out(out)
```